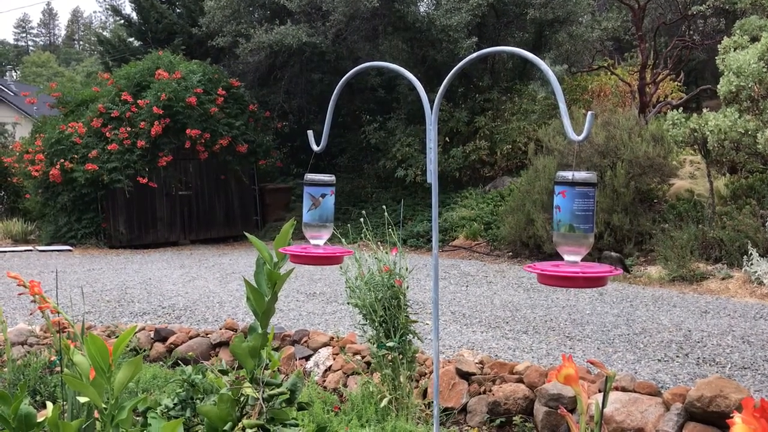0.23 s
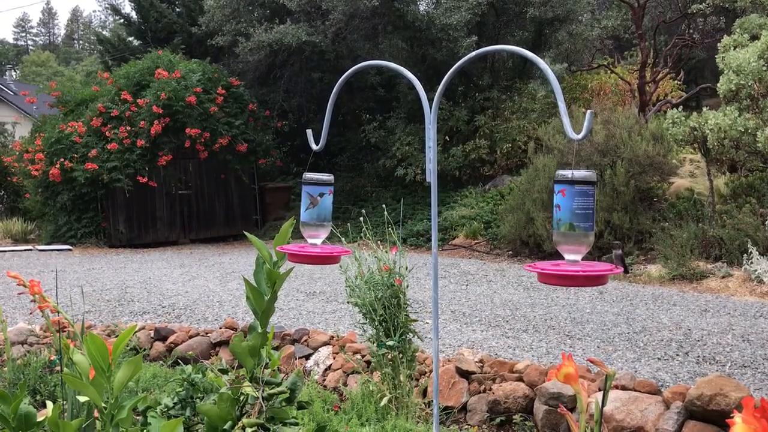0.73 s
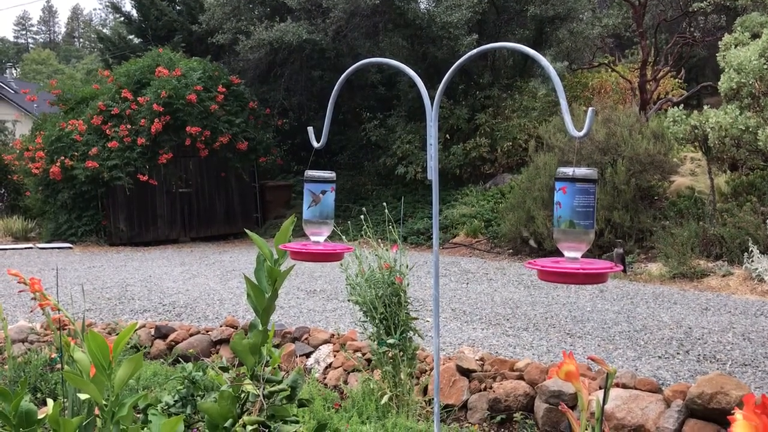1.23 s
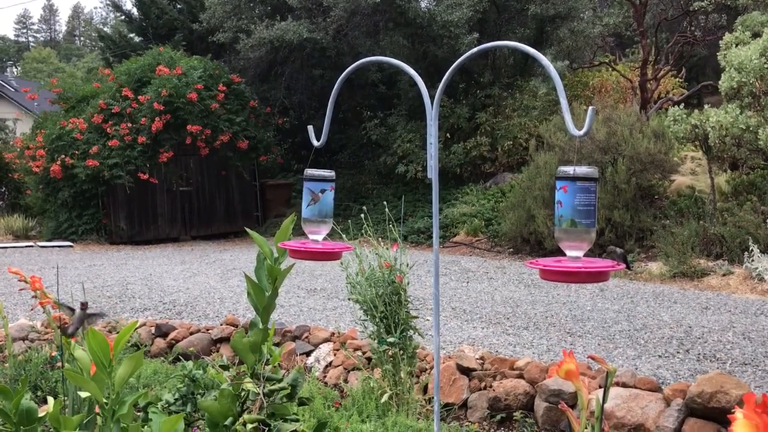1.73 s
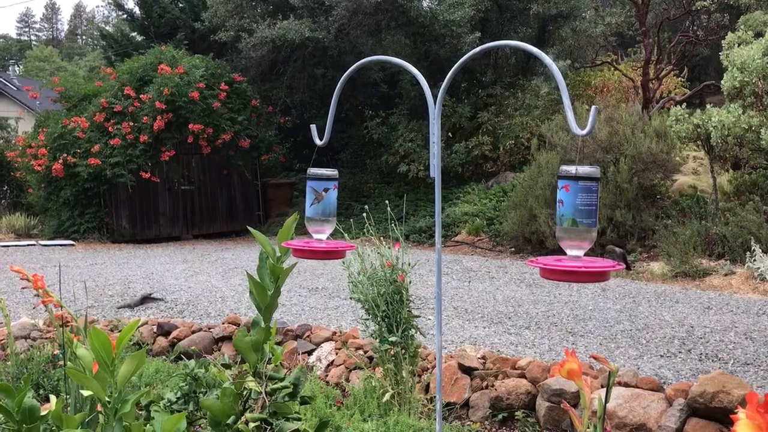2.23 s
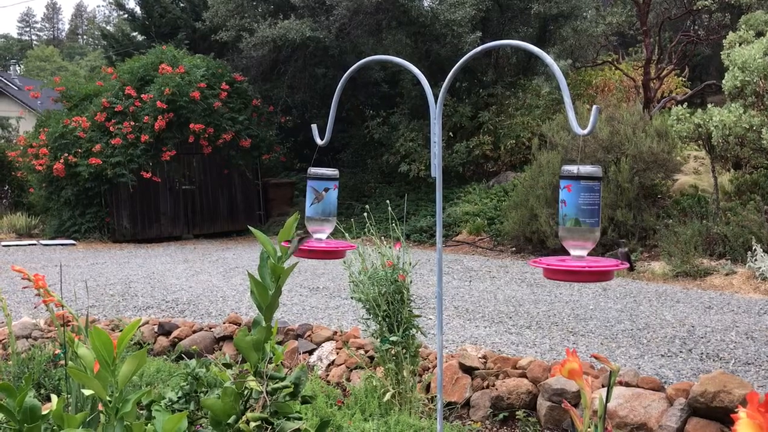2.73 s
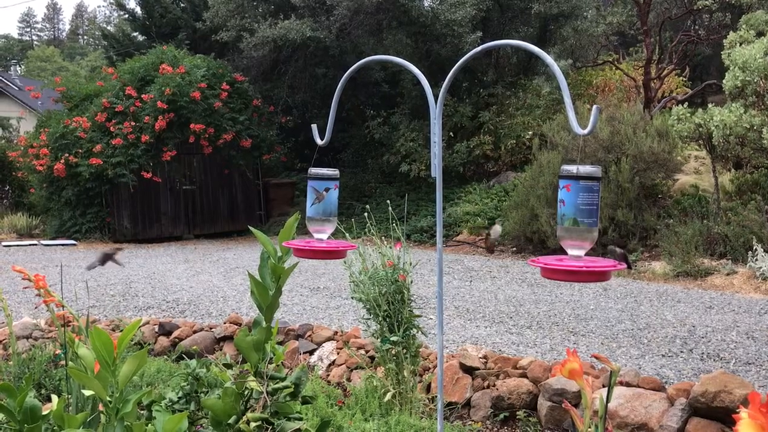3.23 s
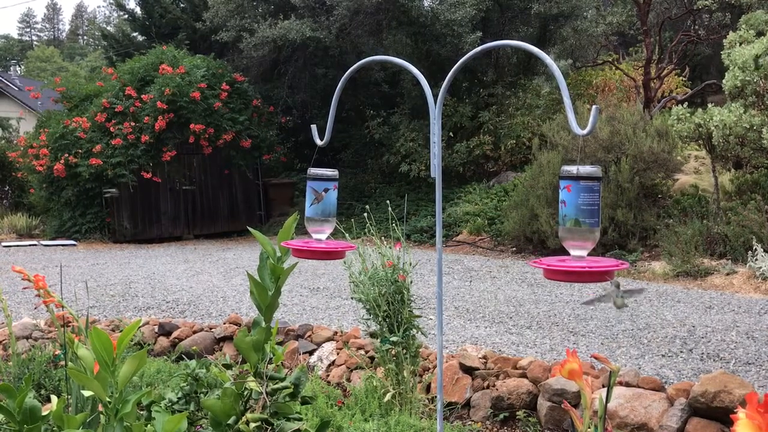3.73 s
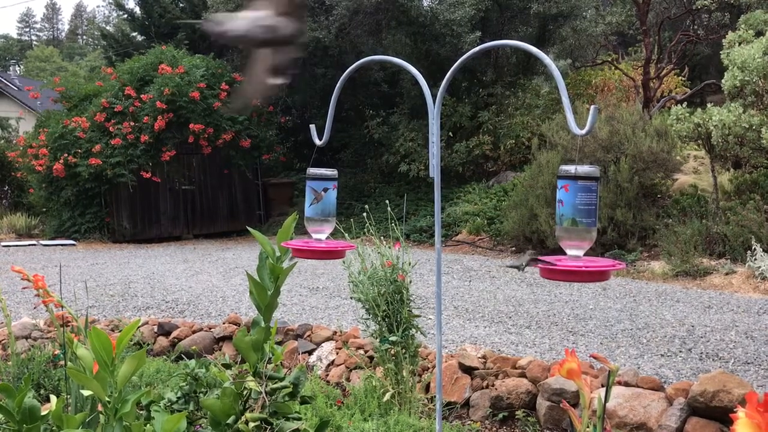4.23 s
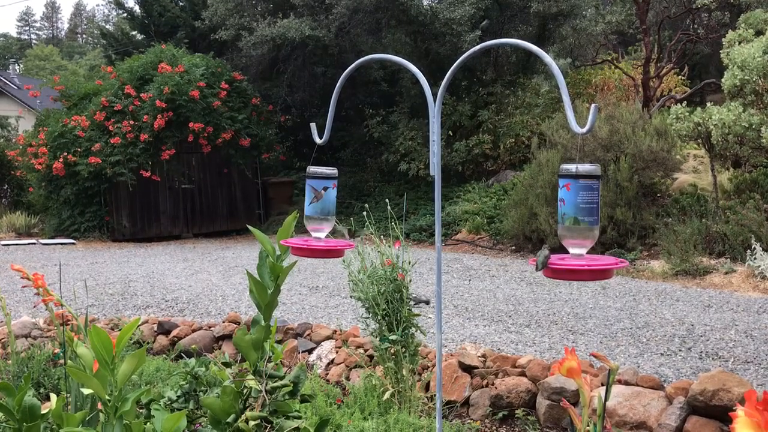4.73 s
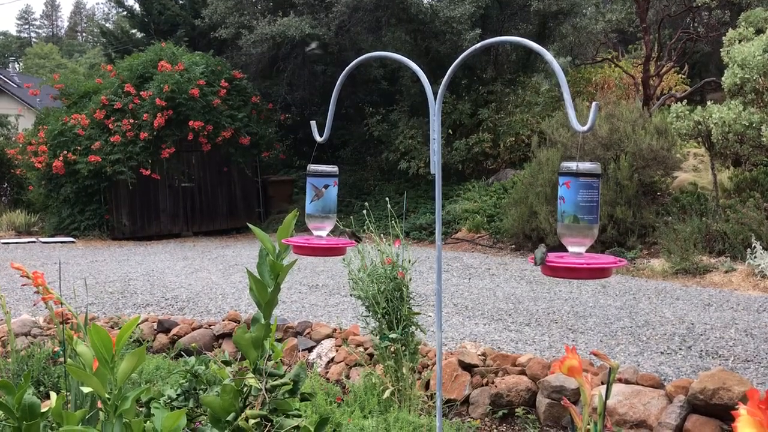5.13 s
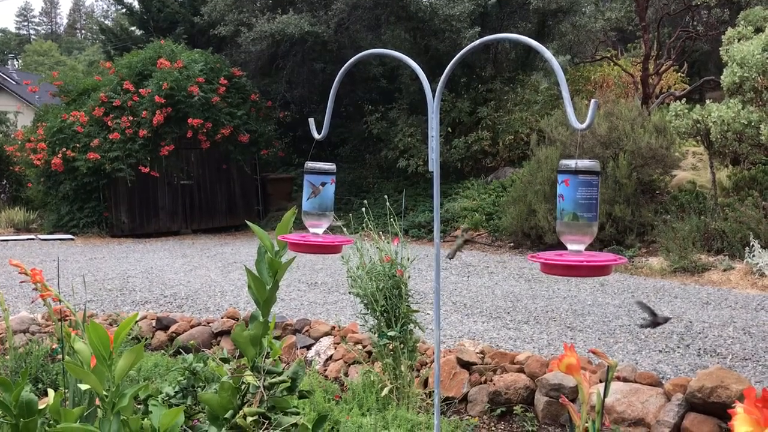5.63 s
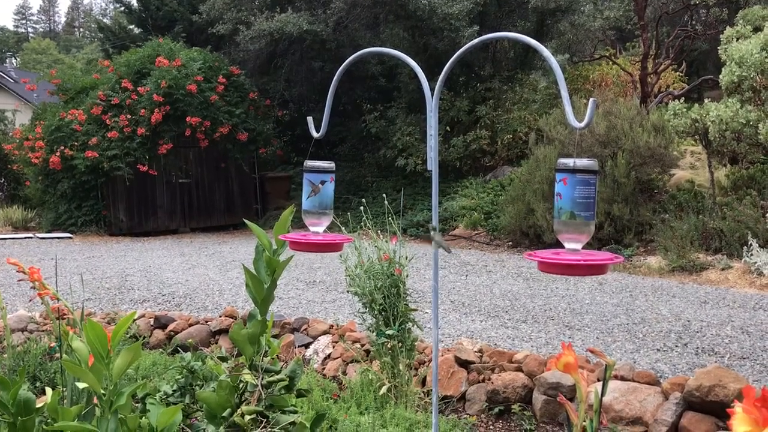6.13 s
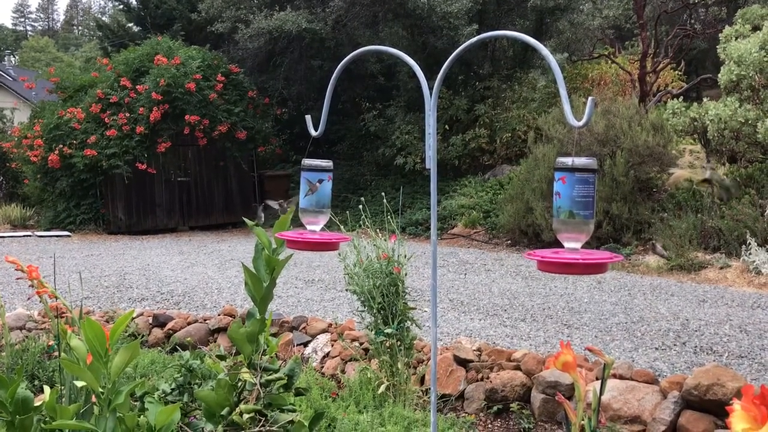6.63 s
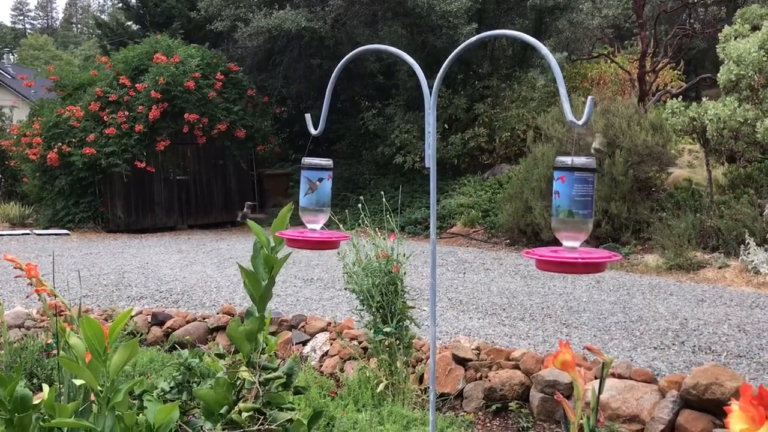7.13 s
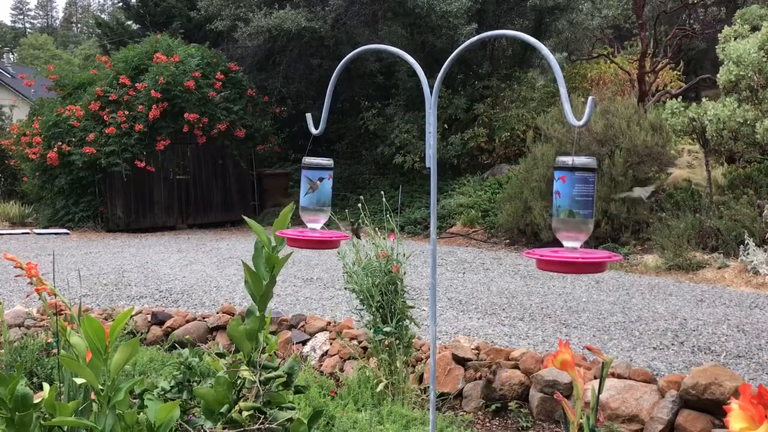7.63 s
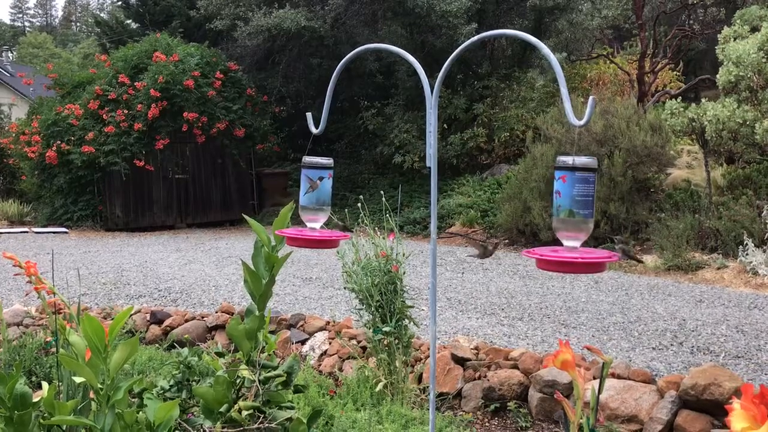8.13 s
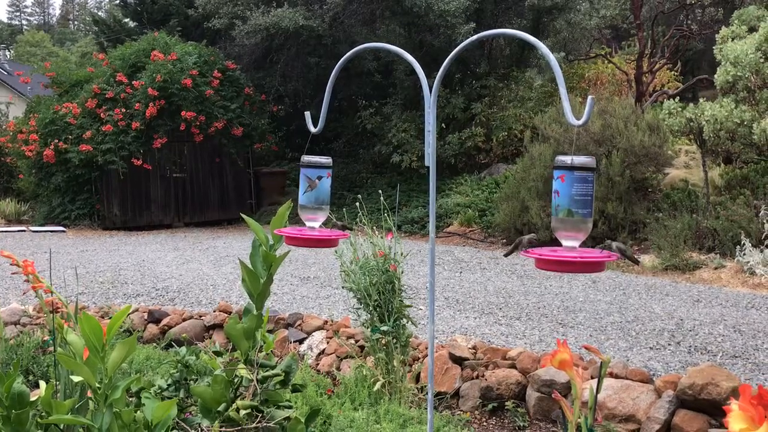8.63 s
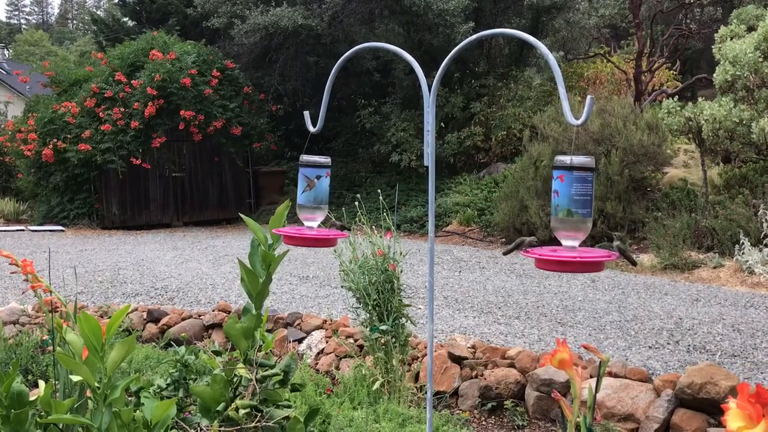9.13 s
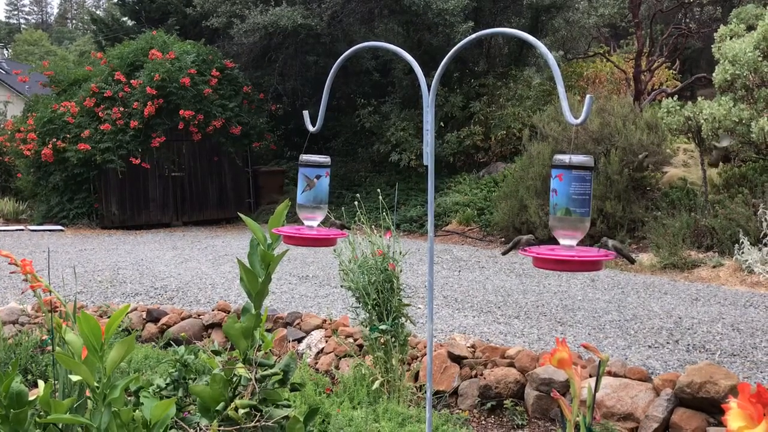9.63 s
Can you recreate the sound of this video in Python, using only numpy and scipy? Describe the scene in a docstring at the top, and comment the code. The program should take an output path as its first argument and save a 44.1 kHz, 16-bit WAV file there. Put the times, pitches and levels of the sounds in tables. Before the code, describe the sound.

Squabbling hummingbirds give thin, warbling chatter and sharp chips while their wings hum and dart past in a quiet garden.

```python
"""Hummingbirds squabble round two feeders in a quiet garden; their wing strokes hum throughout over soft hiss.
From 1 s the syrinx chatters in bouts of whistled, warbling notes, with raspy buzzes in the gaps.
Wings clack at 3.6 s, a bird darts close by at 4.3 s, a sharp chip falls at 5 s, wings scuffle near 6.6 s.
A last bout fades among more chips; after 8.6 s only wings and hiss remain.
Feeders, ground, a shed and foliage give calls and clacks a faint echo."""
import sys
import numpy as np
from scipy import signal
from scipy.fft import rfft, irfft, next_fast_len
from scipy.io import wavfile
from scipy.ndimage import uniform_filter1d, map_coordinates

SR = 44100
rng = np.random.default_rng(int(sys.argv[2]) if len(sys.argv) > 2 else 0)


def dump_mix(stems):
    """Bounce the given channels to the path in sys.argv[1] as a 16-bit WAV at rate SR."""
    frames = np.atleast_2d(stems).T  # one column per channel
    limited = np.clip(frames, -1, 1)  # hard clip at full scale
    pcm = np.round(limited * 32767).astype(np.int16)
    wavfile.write(sys.argv[1], SR, pcm)


N = 436149

# wing stroke spectrum: f/Hz, gain/dB
WING_SPECTRUM = [(25, -21), (45, -9), (90, -1.5), (190, 2.5), (280, -6.5), (390, -8.5), (520, -21.5),
                 (900, -31.5), (2000, -43), (5000, -100)]


def amp(db):
    """Decibels to gain."""
    return 10 ** (np.asarray(db) / 20)


def unit(x):
    """Scale to rms 1."""
    return x / np.sqrt(np.mean(x ** 2) + 1e-20)


def clock(length_s):
    """Sample times in s."""
    return np.arange(max(int(length_s * SR), 8)) / SR


def curves(rows):
    """One value per sample for each column after the time."""
    times_s, *columns = np.transpose(rows)
    return [np.interp(np.arange(N) / SR, times_s, column) for column in columns]


def wobble(knots_per_s, size=N):
    """Smooth random curve."""
    knots = rng.standard_normal(int(size * knots_per_s / SR) + 4)
    return map_coordinates(knots, [np.arange(size) * knots_per_s / SR])


def turns(hz):
    """Frequency to running phase in rad."""
    return 2 * np.pi * np.cumsum(hz) / SR


def coloured(x, points):
    """Filter by (f/Hz, gain/dB) points joined on a log axis."""
    size = next_fast_len(N + 8192)
    hz, db = np.transpose(points)
    gain = amp(np.interp(np.log(np.fft.rfftfreq(size, 1 / SR) + 1), np.log(hz), db))
    return irfft(rfft(x, size) * gain, size)[:N]


def noise(points):
    """Noise of rms 1 with the given spectrum."""
    return unit(coloured(rng.standard_normal(N), points))


def add(track, at_s, sound):
    """Mix a sound into the track."""
    part = track[max(round(at_s * SR), 0):][:len(sound)]
    part += sound[:len(part)]


def outdoor_air():
    """Soft, nearly steady hiss over a low rumble."""
    # air spectrum: f/Hz, relative density/dB
    spectrum = [(15, -40), (25, -22), (66, -4.5), (92, 0.5), (242, -10), (394, -14.5), (503, -19.5),
                (962, -18.5), (3620, -24.5), (6050, -31), (7710, -37), (8830, -36.5), (10400, -42.5),
                (13200, -40), (16000, -36)]
    return amp(-63.5 + 0.19 * wobble(1.88)) * noise(spectrum)


def far_wings(effort):
    """Birds at the feeders drone at their stroke rate, with the full wingbeat an octave below."""
    stroke_hz = 80.16 + 15 * effort
    phase = turns(stroke_hz * (1 + 0.05004 * wobble(14)))
    drone = np.sin(phase) * amp(1.2 * wobble(14)) + 0.16 * np.sin(phase / 2) * amp(1.4 * wobble(2.6))
    stirred_air = noise([(22, -25), (42, 3.5), (100, 1.0), (170, -16.5), (400, -68.0)])
    lull_db = -14 * np.exp(-((np.arange(N) / SR - 8.55) / 0.07) ** 2)  # they settle briefly
    return amp(-65 + 7.5 * effort + lull_db) * unit(unit(drone) + 0.75 * stirred_air)


def wing_strokes(beat_hz):
    """One bird's air pulses, and the gate of the turbulence each stroke sheds."""
    beat = turns(beat_hz * (1 + .02 * wobble(11)))
    stroke = np.floor(beat / np.pi)
    strength = (1 - 0.72 * (stroke % 2)) * amp(3.05 * wobble(50))  # upstrokes are weaker
    pulses = np.diff(stroke, prepend=0) * strength
    return unit(coloured(pulses, WING_SPECTRUM)), amp(2.1 * np.cos(2 * beat))


def near_wings(effort, hum_gain, swish_gain, downwash_gain):
    """Two birds chase each other at slightly different wingbeats, humming and stirring the air."""
    # air swish spectrum: f/Hz, relative density/dB
    swish_spectrum = [(200, -30), (500, 2.5), (1000, 2.5), (2000, -1), (4000, -5), (9000, -12),
                      (16000, -20)]
    chaser_beat_ratio, chaser_db, turbulence_db = .86, -5.5, -3  # re the leader
    beat_hz = (40.94 + 7.5 * effort) * (1 + .04 * wobble(4))
    leader, puffs = wing_strokes(beat_hz)
    chaser, _ = wing_strokes(chaser_beat_ratio * beat_hz * (1 + .04 * wobble(5)))
    turbulence = unit(puffs * noise(WING_SPECTRUM))
    hum = unit(leader + amp(chaser_db) * chaser + amp(turbulence_db) * turbulence)
    swish = unit(puffs * noise(swish_spectrum))
    beat = turns(beat_hz)
    downwash = unit(0.53 * np.sin(beat) + np.sin(2 * beat))  # air pushed per beat and per stroke
    return hum_gain * hum + swish_gain * swish + downwash_gain * downwash


def flight_gains():
    """Gains of hum, swish and downwash: hovering, plus darts that swell and fade with distance."""
    # hum of hovering and jostling: t/s, level/dB
    hovering = [(0, -62), (.35, -74), (.55, -67), (1.0, -73), (1.33, -61), (2.0, -68), (3.05, -76),
                (3.3, -61), (3.55, -57), (4.85, -57.5), (5.1, -65), (5.35, -57.5), (5.62, -56), (6.2, -63),
                (6.35, -58.5), (6.6, -59), (6.8, -54.5), (7.55, -58.5), (8.0, -68), (8.5, -78)]
    # fly-bys: nearest t/s, approach/s, hum/dB, swish/dB, downwash/dB
    darts = [(1.66, 0.082, -60, -73, -65), (3.542, 0.079, -58, -72, -58), (3.77, 0.14, -53, -62.5, -53),
             (4.021, 0.054, -59, -63, -46.5), (4.19, 0.082, -53, -63.5, -58),
             (4.34, 0.081, -43, -59.5, -41.5), (4.521, 0.022, -56.5, -82, -68),
             (6.58, 0.079, -66, -66.5, -56.5), (7.869, 0.0623, -62, -71.5, -53), (8.91, .11, -55, -77, -65),
             (9.32, 0.049, -55.5, -74, -70), (9.76, 0.064, -55, -70, -66), (9.86, 0.043, -58.5, -73, -64.5)]
    swish_re_hum_db, leave_ratio = -15.5, .7
    t = np.linspace(0, N / SR, num=N // 100)
    hover = amp(np.interp(t, *np.transpose(hovering)))
    power = np.array([hover, amp(swish_re_hum_db) * hover, np.zeros_like(t)]) ** 2
    for at_s, approach_s, *levels_db in darts:
        width_s = np.where(t < at_s, approach_s, leave_ratio * approach_s)
        nearness = 1 / (1 + ((t - at_s) / width_s) ** 2)
        reach = [nearness, nearness, nearness ** 2]  # downwash reaches least far
        power += (amp(levels_db)[:, None] * reach) ** 2
    return curves(np.column_stack([t, *np.sqrt(power)]))


def wings():
    """The harder the birds fly, the louder and faster their wings beat."""
    hum, swish, downwash = flight_gains()
    effort = 1 / (1 + (amp(-60) / hum) ** 2)
    return near_wings(effort, hum, swish, downwash) + far_wings(effort)


def garden_echo(x, tail_db, t60_s):
    """Distinct echoes and soft scatter from foliage; faint, distant calls carry more scatter."""
    # reflections off feeders, ground and shed: delay/s, gain/dB
    echoes = [(.0045, -12.5), (.009, -19), (.056, -65), (0.072, -34.5)]
    out = x.copy()
    for delay_s, db in echoes:
        add(out, delay_s, amp(db) * x)
    # scatter is about as strong from near and far; only the direct sound fades
    loudness = np.sqrt(np.abs(uniform_filter1d(x ** 2, 1500)))
    send = x / (1 + loudness / amp(-70.5)) ** 0.89
    t = clock(.6)
    decay = amp(-60 * t / t60_s) + 3.4 * amp(-60 * t / 0.022)
    tail = rng.standard_normal(len(t)) * decay * (t > .002)
    return out + amp(tail_db) * signal.fftconvolve(send, tail / np.linalg.norm(tail))[:N]


def scuffle():
    """Wings clack together; stiff feathers rattle in sharp turns."""
    # wing clacks: t/s, level/dB
    clacks = [(3.618, -32), (6.612, -33.5), (6.617, -39), (6.656, -59), (6.670, -48.5), (6.677, -50)]
    # feather rattles: t/s, length/s, flap rate/Hz, level/dB
    rattles = [(5.57, 0.069, 177.2, -59.5), (6.467, 0.078, 153, -61)]
    track = np.zeros(N)
    for at_s, db in clacks:
        t = clock(.01)
        add(track, at_s, amp(db - 60 * t / 0.0074) * rng.standard_normal(len(t)))
    for at_s, length_s, flap_hz, db in rattles:
        t = clock(length_s)
        flaps = amp(10.8 * np.cos(2 * np.pi * flap_hz * t)) * np.sin(np.pi * t / length_s)
        add(track, at_s, amp(db) * unit(flaps * rng.standard_normal(len(t))))
    return coloured(track, [(300, -1.0), (1000, 4.5), (2500, -2), (5500, 2), (10000, -7.5), (16000, -8)])


def syrinx(hz, overtone_db, rasp, beak_hz):
    """A tone whose overtones grow as the pitch sinks; rasp is fast jitter of the membrane."""
    phase = turns(hz) + rasp * hz / 6000 * wobble(3000, size=len(hz))
    overtone = amp(np.minimum(overtone_db - 9 * np.log2(hz / 6000), -4))
    tone = sum(overtone ** (k - 1) * np.sin(k * phase) * (k * hz < SR / 2) for k in range(1, 5))
    flicker = amp(1.6 * wobble(600, size=len(hz)))
    beak_loss = np.sqrt(1 + (beak_hz / hz) ** 5)  # a small beak radiates low pitches poorly
    return np.sqrt(2) * tone * flicker / beak_loss


def dry_rasp(length_s, pulse_hz, db):
    """Each slow pulse whips up from a low pitch and rings the throat as it passes its resonance."""
    t = clock(length_s)
    rise = np.mod(t * pulse_hz, 1)
    hz = np.interp(rise, [0, .55, .8, 1], [1700, 7900, 6200, 1700])
    throat = 1 + 0.34 / (1 + ((hz - 6900) / 900) ** 2)
    swell = np.interp(t / length_s, [0, .1, .8, 1], [.1, 0.22, 0.76, 1.0])
    pulses = np.sin(np.pi * rise ** .8)
    return amp(db) * unit(swell * throat * pulses * syrinx(hz, overtone_db=-8, rasp=.45, beak_hz=3000))


def buzz(db, length_s=.027, pulse_hz=330):
    """A swelling string of arched pulses; the last ones drop low and turn harsh."""
    t = clock(length_s)
    progress = t / length_s
    cycle = turns(pulse_hz * (1 + 0.064 * wobble(190, size=len(t))))
    collapse = np.clip((progress - .7) / .2, 0, 1)
    base_hz = 6473 - 25 * (db + 60)  # harder buzzes sit lower
    centre_hz = base_hz * (.87 + .1 * np.sin(np.pi * progress)) * (1 - .46 * collapse)
    hz = centre_hz * (1 - (.16 + .15 * collapse) * np.cos(cycle))
    pulses = amp(-(8 - 5 * collapse) * (1 + np.cos(cycle + .3)))
    swell = np.interp(progress, [0, .1, .75, .9, 1], [0, .45, 1, .4, 0])
    tone = syrinx(hz, overtone_db=-12.5 + 7 * collapse, rasp=.24 + 1.1 * collapse, beak_hz=3700)
    return amp(db) * unit(swell * pulses * tone)


def chip(length_s, top_hz, db):
    """One whistle that plunges ever faster."""
    t = clock(length_s)
    left_s = length_s - t
    hz = top_hz - (top_hz - 1600) * np.exp(-left_s / .0037)
    edges = np.clip(t / 0.0041, 0, 1) * np.clip(left_s / 0.00026, 0, 1)
    swell = amp(-1400 * np.maximum(left_s - .005, 0))
    return amp(db) * edges * swell * syrinx(hz, overtone_db=-4 - 1200 * left_s, rasp=0.065, beak_hz=5100)


def note(whistle_s, swoop_s, trill_s, whistle_hz, swoop_depth_hz, trill_hz, end_hz, warble_hz,
         whistle_db, trill_db):
    """A high whistle breaks into deep swoops, then a fast warble that sinks as the push runs out."""
    mid_swoop_s, onset_s = whistle_s + swoop_s / 2, whistle_s + swoop_s  # onset of the trill
    end_s = onset_s + trill_s
    t = clock(end_s)
    swoops = np.clip(np.round(swoop_s / .0085), 1, 2)
    cycle = 2 * np.pi * swoops * np.clip((t - whistle_s) / swoop_s, 0, 1) ** 0.95
    cycle += turns((t > onset_s) * warble_hz * (1 + .09 * wobble(200, size=len(t))))
    # pitch dips from a sinking crest
    crest_times_s = [whistle_s, mid_swoop_s, onset_s, onset_s + .42 * trill_s,
                     end_s - .1275 * trill_s, end_s]
    crests_hz = [whistle_hz, whistle_hz * 1.07, trill_hz * 1.22, trill_hz * 1.17, trill_hz * 1.046, end_hz]
    crest_hz = np.minimum(np.interp(t, crest_times_s, crests_hz), 10100)  # top of the bird's range
    depth_times_s = [whistle_s + .72 * swoop_s, onset_s + .1 * trill_s, end_s - .181 * trill_s, end_s]
    depth_hz = np.interp(t, depth_times_s, [swoop_depth_hz, 3620, 3150, 2090])
    arch = 1 + 0.036 * (np.sin(np.pi * np.clip(t / whistle_s, 0, 1)) - .5) * (t < whistle_s)
    hz = np.maximum(crest_hz * arch - depth_hz * (1 - np.cos(cycle)) / 2, 2500)
    hz *= 1 + .022 * wobble(400, size=len(t))
    level_db = np.interp(t, [whistle_s / 2, mid_swoop_s, onset_s + trill_s / 2, end_s],
                         [whistle_db, 0, trill_db - 3.5, trill_db])
    throb_depth = np.interp(t, [whistle_s, onset_s, end_s - .2 * trill_s, end_s], [.2, .55, .7, .25])
    throb = 1 + throb_depth * np.cos(cycle - .4)  # loudest near each crest
    edges = np.clip(t / 0.0063, 0, 1) * np.clip((end_s - t) / 0.003, 0, 1)
    # the tone hardens toward the end
    rasp = np.interp(t, [whistle_s, onset_s, end_s], [.02, .09, .42])
    overtone_db = np.interp(t, [whistle_s, onset_s, end_s], [-14.5, -11.5, -6.5])
    return amp(level_db) * throb * edges * syrinx(hz, overtone_db, rasp, beak_hz=0.41 * trill_hz)


def chatter(at_s, lengths_s):
    """A note in the voice of its bout, lower the longer the bout has run."""
    # bouts, one bird's voice each: t/s, whistle/Hz, whistle sag/(Hz/s), swoop depth/Hz, trill/Hz,
    # end/Hz, warble rate/Hz, whistle re swoop/dB, trill re swoop/dB
    bouts = [(.98, 9850, 1755, 3930, 6710, 4220, 342, -5.5, -2),
             (1.919, 9430, 949, 3500, 7540, 6600, 330, -3.5, -0.5),
             (3.359, 9190, 0, 3670, 6320, 4100, 78, 3, 4),
             (3.562, 8950, 597, 3196, 7200, 6170, 305, -5, -5),
             (5.4, 9670, 1098, 4500, 7950, 6170, 430, -4, .5),
             (6.17, 9160, 0, 2820, 6686, 3800, 530, -3, -2.5),
             (6.94, 9480, 949, 4494, 8050, 6502, 390, -1, 0.5)]
    bout = [row for row in bouts if row[0] <= at_s][-1]
    start_s, whistle_hz, sag_hz_per_s, depth_hz, trill_hz, end_hz, warble_hz, whistle_db, trill_db = bout
    whistle_hz -= sag_hz_per_s * (at_s - start_s)
    trill_sag_hz = 400 * (at_s - start_s)
    warble_hz *= 1 + 0.0955 * rng.standard_normal()
    return note(*lengths_s, whistle_hz, depth_hz, trill_hz - trill_sag_hz, end_hz - trill_sag_hz,
                warble_hz, whistle_db, trill_db)


def voices():
    """All calls of the quarrel, coloured by the throat."""
    # chatter notes: t/s, whistle/s, swoop/s, trill/s, level/dB
    notes = [(1.003, 0.017, 0.0073, 0.027, -47.5), (1.145, .002, 0.0166, .029, -44.5),
             (1.278, .0075, .013, 0.022, -45.5), (1.444, .008, 0.013, 0.02, -39.5),
             (1.61, 0.0064, 0.017, 0.023, -39), (1.785, 0.0079, 0.02, 0.019, -38),
             (1.93, 0.045, 0.012, 0.0055, -61), (2.081, 0.033, 0.0096, 0.0287, -59.5),
             (2.233, 0.014, 0.0097, 0.049, -59), (2.439, 0.0067, 0.0097, 0.029, -57.5),
             (2.612, 0.0069, 0.0083, .024, -55), (2.822, 0.0095, 0.012, 0.035, -57),
             (2.991, .007, 0.013, 0.035, -56), (3.117, 0.0054, 0.01, 0.0067, -53),
             (3.242, 0.0073, 0.016, 0.0084, -53), (3.379, .02, 0.0052, 0.0092, -43),
             (3.582, .0085, 0.0084, 0.046, -45.5), (3.773, 0.0083, .013, .04, -44.5),
             (3.954, 0.0051, .013, 0.018, -49.5), (4.13, 0.0054, .012, 0.027, -48.5),
             (4.384, 0.0064, .011, 0.037, -49), (4.557, .006, 0.013, 0.047, -52),
             (4.75, 0.0068, 0.014, 0.032, -53), (5.416, 0.00205, 0.0025, .045, -47.5),
             (5.514, 0.0094, 0.0048, .038, -44.5), (5.616, 0.0066, .013, 0.033, -46.5),
             (5.722, 0.0045, .015, .031, -45.5), (5.83, 0.0042, 0.011, 0.039, -46.5),
             (5.935, 0.0035, 0.01, 0.032, -46), (6.186, 0.022, 0.0049, 0.038, -44),
             (6.958, 0.00384, 0.0026, 0.057, -53), (7.061, 0.0048, .005, 0.044, -45.5),
             (7.167, 0.0051, 0.013, 0.034, -44.5), (7.281, 0.0059, .013, 0.039, -45.5),
             (7.398, 0.0051, 0.014, 0.035, -45.5), (7.593, 0.0033, 0.01, 0.032, -58.5),
             (7.77, 0.0068, 0.0098, 0.033, -58.5), (7.944, 0.0056, .012, 0.036, -61),
             (8.139, 0.0039, 0.01, 0.038, -68.5), (8.343, 0.0026, 0.011, 0.026, -68.5)]
    # buzzes between notes: t/s, level/dB
    buzzes = [(1.363, -51), (1.531, -44.5), (1.703, -44), (1.886, -47.5), (2.364, -65.5), (2.54, -63.5),
              (2.92, -60), (3.426, -55.5), (4.056, -58.5), (4.22, -58), (4.302, -58.5), (4.482, -56.5),
              (4.666, -61.5), (6.301, -67.5), (7.52, -63), (7.697, -63), (7.868, -64), (8.044, -70),
              (8.235, -69.5), (8.417, -73.5)]
    # dry rasps at close quarters: t/s, length/s, pulse rate/Hz, level/dB
    rasps = [(3.606, 0.041, 170, -50), (3.696, 0.025, 146, -48), (3.857, 0.061, 138, -46),
             (3.976, .027, 160, -49.5)]
    # sharp chips: end t/s, length/s, top f/Hz, level/dB
    chips = [(0.736, 0.009, 8900, -69.5), (5.0028, 0.011, 8280, -35), (7.591, 0.018, 8330, -40),
             (7.8583, 0.00782, 8580, -38.5), (8.5779, 0.0074, 8720, -45)]
    # throat response: f/Hz, gain/dB
    throat = [(900, -24), (1800, 7.5), (3000, 2.5), (4300, -3), (5800, 0.7), (7000, -1), (7900, -4.5),
              (9200, 0.55), (16000, -5)]
    track = np.zeros(N)
    for at_s, *lengths_s, db in notes:
        add(track, at_s, amp(db) * chatter(at_s, lengths_s))
    for at_s, db in buzzes:
        add(track, at_s, buzz(db))
    for at_s, length_s, pulse_hz, db in rasps:
        add(track, at_s, dry_rasp(length_s, pulse_hz, db))
    for end_s, length_s, top_hz, db in chips:
        add(track, end_s - length_s, chip(length_s, top_hz, db))
    return coloured(track, throat)


def scene():
    """Calls and wings over the outdoor air, alike in both channels."""
    mono = outdoor_air() + garden_echo(voices() + scuffle(), tail_db=6, t60_s=0.42) + wings()
    return np.array([mono, mono])


def record(dry):
    """Microphone bass cut and treble lift, then a band limit."""
    # microphone response: f/Hz, gain/dB
    response = [(22, -9), (38, -0.5), (3000, -0.5), (9500, 5.5), (10600, 4.5), (12000, 9), (16000, 1)]
    top_hz = 15950
    heard = np.array([coloured(channel, response) for channel in dry])
    return irfft(rfft(heard) * (np.fft.rfftfreq(N, 1 / SR) < top_hz), N)


dry = scene()
out = record(dry)
dump_mix(out)
```